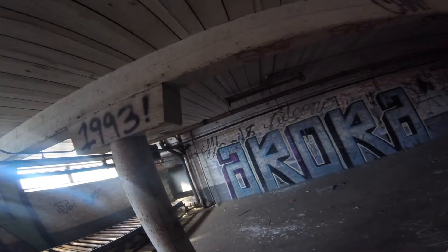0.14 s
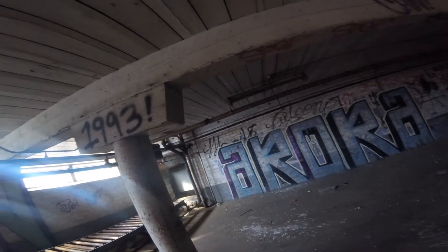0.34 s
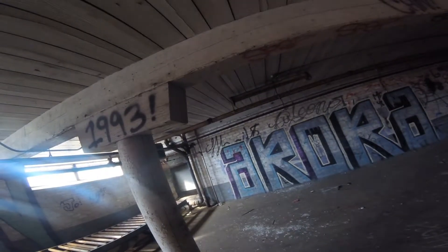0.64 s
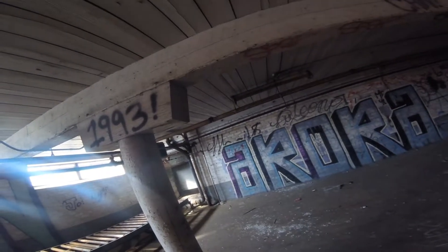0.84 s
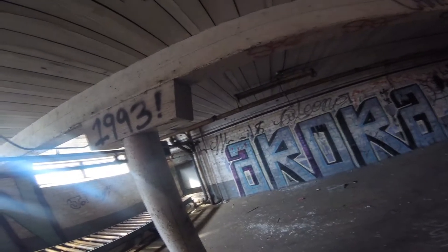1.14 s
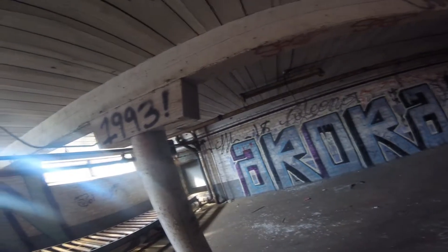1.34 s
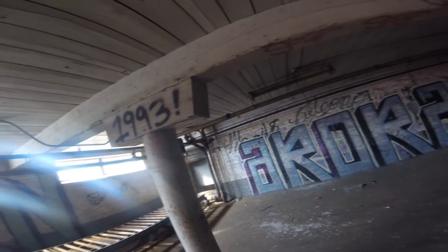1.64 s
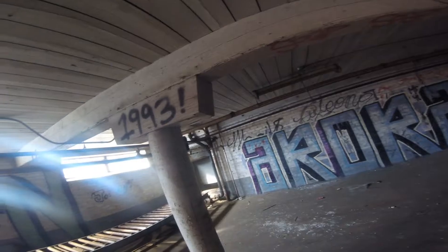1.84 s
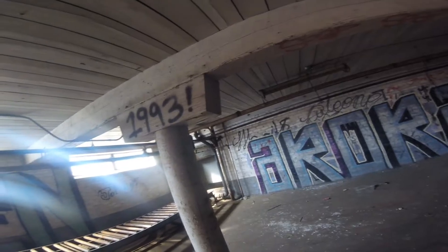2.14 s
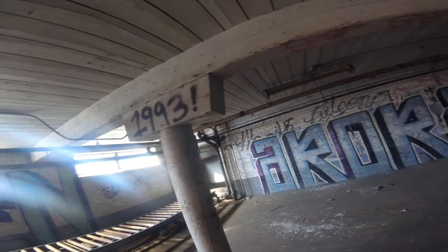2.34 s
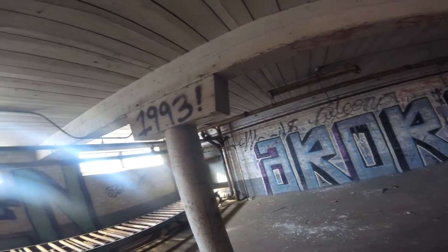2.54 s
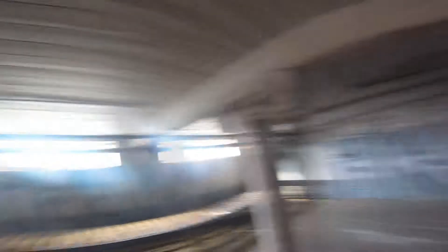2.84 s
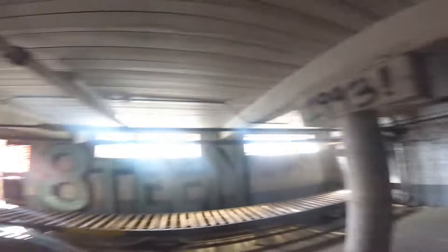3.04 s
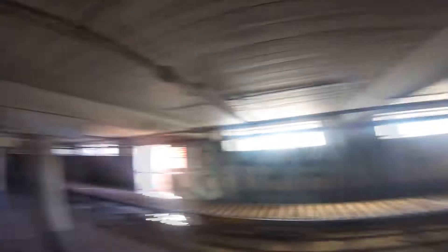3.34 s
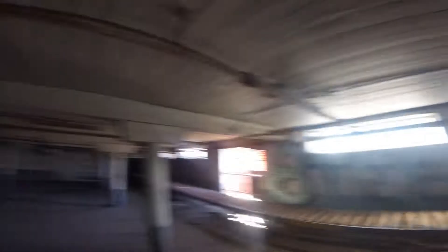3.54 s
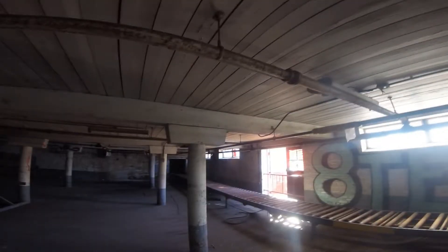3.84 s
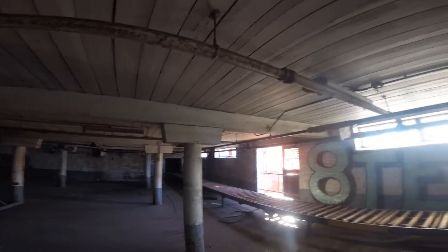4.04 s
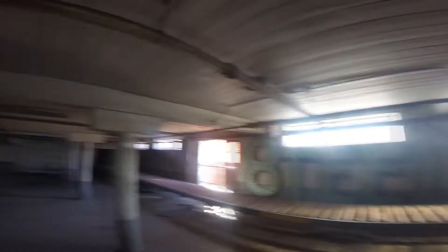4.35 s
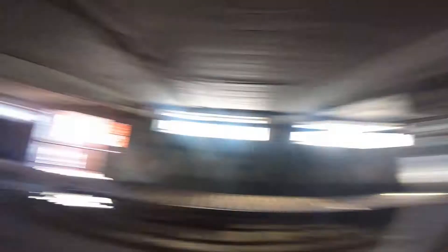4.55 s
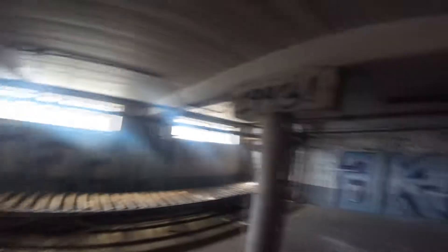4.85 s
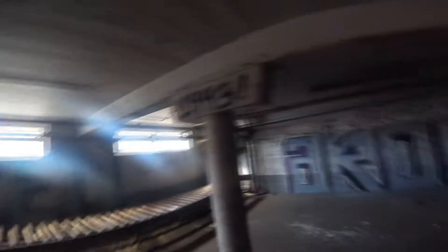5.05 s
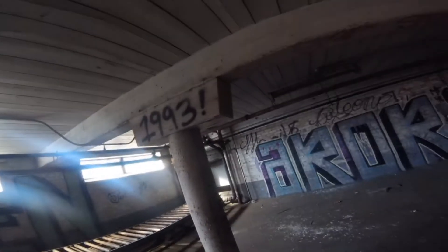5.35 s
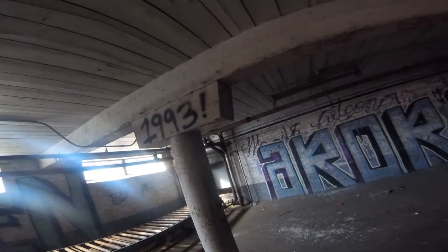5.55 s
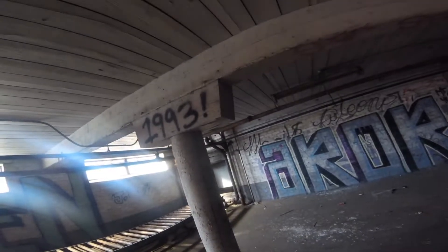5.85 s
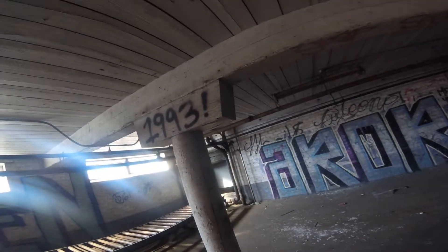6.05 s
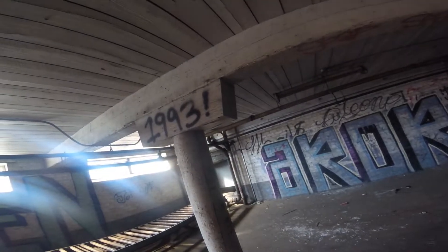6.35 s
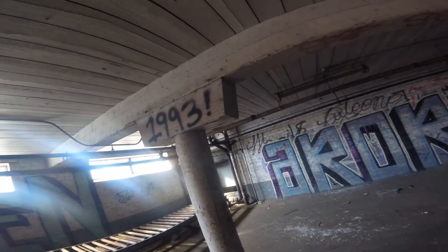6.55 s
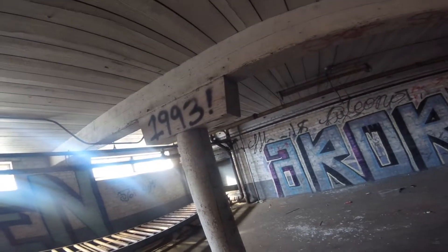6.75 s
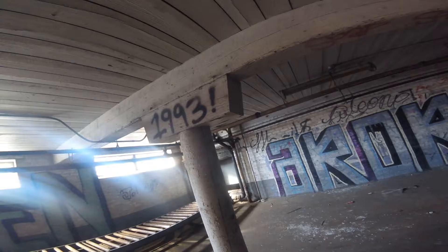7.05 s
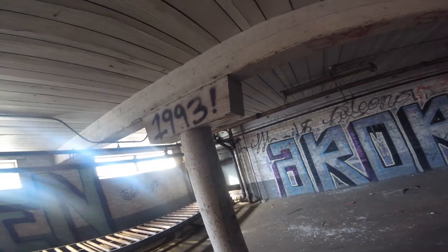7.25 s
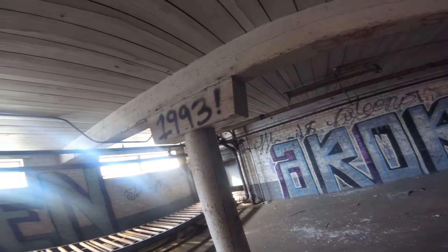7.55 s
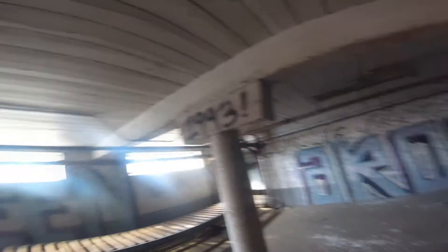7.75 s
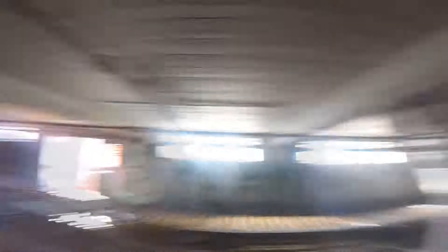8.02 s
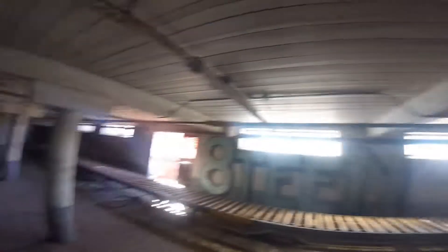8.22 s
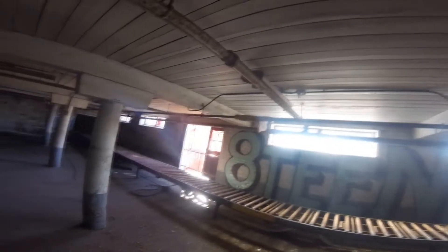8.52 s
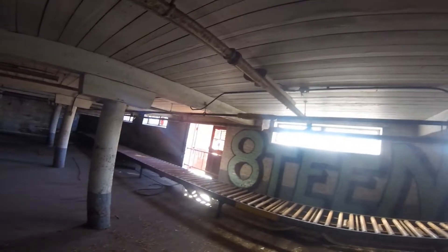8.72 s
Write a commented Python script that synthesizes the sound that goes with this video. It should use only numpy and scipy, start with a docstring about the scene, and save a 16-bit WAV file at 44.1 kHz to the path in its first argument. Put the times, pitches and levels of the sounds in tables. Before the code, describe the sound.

A person shifts weight in a large, bare concrete building. Chips snap and crumble under rubber soles, heels thud softly, small shards tick brightly. Activity comes in clusters: at the start, around four and a half seconds, and around seven, where a foot drags through grit and one loudest crack follows. Quick reflections and a tail over a second long; low handling rumble, faint wash and thin treble hiss.

```python
"""A large empty hall: someone shifts and turns on gritty concrete, a small camera and its microphone in hand.
Close below, chips crack under the soles in bursts of tiny fractures; one foot drags through the grit as
noise and snaps, and heels knock as damped sines. Floor, pillars and ceiling answer at once, the hall rings
on as decaying noise. Air and handling rumble on the microphone, over a faint wash and hiss."""
import sys
import numpy as np
from scipy import signal
from scipy.fft import rfft, irfft
from scipy.io import wavfile

SR = 44100
rng = np.random.default_rng(int(sys.argv[2]) if len(sys.argv) > 2 else 0)


def unload_audio(sound):
    """Save the sound as a 16-bit wav file, at the path given as the first command line argument."""
    columns = np.transpose(np.atleast_2d(sound))
    # keep every value between -1 and 1, then stretch to whole-number steps
    steps = np.round(np.clip(columns, -1, 1) * 32767)
    wavfile.write(sys.argv[1], SR, steps.astype(np.int16))


N = 391608
TIME = np.arange(N) / SR


def undb(db):
    """Decibels to gain."""
    return 10 ** (np.asarray(db) / 20)


def unit(x):
    """Scale to rms 1."""
    return x / np.sqrt(np.mean(x ** 2) + 1e-20)


def add(out, s, x):
    """Mix x into out from time s."""
    i = max(int(s * SR), 0)
    out[i:i + len(x)] += x[:max(N - i, 0)]


def band(x, lo_hz, hi_hz):
    """Causal band-pass."""
    edges = [lo_hz, min(hi_hz, SR / 2 - 1)]
    return signal.sosfilt(signal.butter(3, edges, "band", fs=SR, output="sos"), x)


def ring(x, hz, width_hz):
    """One resonance, gain 1 at its centre."""
    return signal.lfilter(*signal.iirpeak(hz, hz / width_hz, fs=SR), x)


def colour(x, spectrum, size=8192):
    """Causal minimum-phase filter through (Hz, dB) points, built from the cepstrum."""
    hz, db = np.transpose(spectrum)
    grid = np.maximum(np.arange(size // 2 + 1) * SR / size, 1)
    gain = undb(np.interp(np.log(grid), np.log(hz), db))
    cepstrum = irfft(np.log(gain))
    # fold the cepstrum onto positive time
    cepstrum[1:size // 2] *= 2
    cepstrum[size // 2 + 1:] = 0
    response = irfft(np.exp(rfft(cepstrum)))
    return signal.fftconvolve(x, response)[:len(x)]


def walk(rate):
    """Random wander, spread near 1, with straight lines between `rate` knots per second."""
    knots = rng.standard_normal(int(N / SR * rate) + 2)
    return np.interp(TIME * rate, np.arange(len(knots)), knots)


def gain_curve(s, db, fade=0.024):
    """Gain along a dB curve, fading to silence outside it."""
    gate = np.interp(TIME, [s[0] - fade, s[0], s[-1], s[-1] + fade], [0, 1, 1, 0])
    return undb(np.interp(TIME, s, db)) * gate


def fade(t, t60):
    """Exponential decay, 60 dB down after t60."""
    return np.exp(-np.log(1000) * t / t60)


def swell(s, half_s):
    """A smooth rise and fall around time s, top 1."""
    return np.exp(-np.minimum(((TIME - s) / half_s) ** 2, 20))


def fractures(count, rate, spread_db):
    """Tiny clicks of either sign at random moments, `rate` per second, their sizes spread in dB."""
    size = undb(spread_db * np.minimum(rng.exponential(size=count), 4))
    happens = rng.random(count) < rate / SR
    return happens * rng.choice([-1, 1], count) * size


# faint wash of the hall, heard from far off: (frequency [Hz], level [dB per Hz])
HALL_WASH = [(60, -1.5), (110, -5.5), (190, -9.5), (350, -11), (600, -16.5), (1300, -19.5), (2500, -23),
             (4000, -29.5), (6000, -41.5), (10000, -64)]
# the microphone's own hiss, peaked in the treble: (frequency [Hz], level [dB per Hz])
MICROPHONE_HISS = [(3000, -28.5), (5700, -11.5), (6200, -6), (6500, 3.5), (6950, -4.5), (8000, -6),
                   (9400, -11), (10200, -17.5), (12500, -15.5), (14500, -40)]


def background(wash_db=-56, hiss_db=-64.5):
    """The hall's even wash and the microphone's own hiss, both steady coloured noise."""
    wash = unit(colour(rng.standard_normal(N), HALL_WASH))
    hiss = unit(colour(rng.standard_normal(N), MICROPHONE_HISS))
    return undb(wash_db) * wash + undb(hiss_db) * hiss


# air rumble at the microphone: (frequency [Hz], level [dB per Hz])
AIR_RUMBLE = [(10, -5), (25, 3.5), (50, -3.5), (80, -9.5), (130, -18.5), (220, -26), (500, -69.5)]
# body sways that drive more air past the microphone: (middle [s], half length [s], rise [dB])
BODY_SWAYS = [(.1, 0.75, 6.5), (3.153, 0.21, 5.5), (4.55, 0.72, 6), (6.656, 0.79, 4)]
# pushes on the camera body: (time of the top [s], level [dB], pitch [Hz])
CAMERA_PUSHES = [(3.966, -29, 23.8), (6.59, -28.5, 55.5), (7.55, -30.5, 39.4)]


def handling(still_air_db=-47.5, gust_db=1, push_cycles=0.75):
    """Air rumbles on the microphone, more as the body sways; each push is a short low swing."""
    rises = sum(rise * swell(s, half) for s, half, rise in BODY_SWAYS)
    air_db = still_air_db + rises + gust_db * walk(23)
    out = unit(colour(rng.standard_normal(N), AIR_RUMBLE)) * undb(air_db)
    for s, db, hz in CAMERA_PUSHES:
        push = np.cos(2 * np.pi * hz * (TIME - s)) * swell(s, push_cycles / hz)
        out += undb(db) * push
    return out


SLIP_S, SLIP_HALF_S, SLIP_DB = 3.419, 0.016, -26  # middle [s], half length [s], level [dB]
SLIP_HZ, SLIP_OCTAVES_PER_S = 75.2, 35  # pitch at the middle and its rise


def finger_slip(overtone_db=-11):
    """Skin slips on the camera case: a brief low groan that rises, with its octave."""
    glide_s = np.clip(TIME - SLIP_S, -2 * SLIP_HALF_S, 2 * SLIP_HALF_S)
    hz = SLIP_HZ * 2 ** (SLIP_OCTAVES_PER_S * glide_s)
    phase = 2 * np.pi * np.cumsum(hz) / SR
    groan = np.sin(phase) + undb(overtone_db) * np.sin(2 * phase)
    return undb(SLIP_DB) * groan * swell(SLIP_S, SLIP_HALF_S)


def hall(x, far_db=-8.0, low_t60=1.77, mid_t60=1.17, high_t60=1.0,
         far_low_db=-4, far_high_db=-3, build_s=0.037):
    """The long diffuse tail of the empty hall: three noise bands, the treble dying first."""
    t = np.arange(3 * SR // 2) / SR
    low, mid, high = rng.standard_normal((3, len(t)))
    tail = undb(far_low_db) * band(low, 86, 980) * fade(t, low_t60)
    tail += band(mid, 1300, 4770) * fade(t, mid_t60)
    tail += undb(far_high_db) * band(high, 4600, 8700) * fade(t, high_t60)
    tail *= 1 - np.exp(-t / build_s)  # echoes gather before they decay
    return signal.fftconvolve(x, undb(far_db) * tail / np.linalg.norm(fade(t, mid_t60)))[:N]


def reflections(x, near_db=-6.0, near_t60=0.15):
    """Quick reflections from floor, pillars and low ceiling: sparse echoes after 5 ms."""
    t = np.arange(SR // 4) / SR
    echoes = fractures(len(t), rate=3800, spread_db=0.0) * fade(t, near_t60) * (t > 0.005)
    return signal.oaconvolve(x, undb(near_db) * echoes / np.linalg.norm(echoes))[:N]


def brush(s=1.805, half_s=0.056, level_db=-53, lo_hz=1200, hi_hz=4300, flutter_db=3.5):
    """A sole sweeps lightly over fine dust: a soft, fluttering hiss."""
    dust = unit(band(rng.standard_normal(N), lo_hz, hi_hz)) * undb(flutter_db * walk(59.8))
    return undb(level_db) * dust * swell(s, half_s)


# grit under a turning foot: (frequency [Hz], level [dB per Hz])
TURNED_GRIT = [(500, -2), (900, 1.5), (1600, 1), (3000, -3.5), (4300, -7), (5500, -14.5), (9000, -30)]
# rub of the rubber sole: (frequency [Hz], level [dB per Hz])
RUBBER_SOLE = [(120, -38), (260, -2.5), (400, -2), (550, -6.5), (900, -11.5), (2000, -48)]
# light turns of the foot, before the common trims of grit and rubber:
# (middle [s], half length [s], grit level [dB], rubber level [dB])
FOOT_TURNS = [(0.03, 0.13, -54, -56), (0.365, 0.12, -54, -49.5), (0.59, 0.035, -57, -49),
              (3.05, .05, -75, -58.5), (4.312, .07, -56.5, -61.5), (4.54, 0.056, -53.5, -57),
              (4.724, 0.068, -51.5, -48.5), (4.936, 0.07, -56.5, -53), (5.76, 0.28, -60.5, -58.5),
              (6.3, 0.28, -59, -58), (7.078, 0.059, -44.5, -53), (8.288, .06, -58.5, -62),
              (8.494, 0.084, -58, -56.5)]


def shuffles(grit_trim_db=-2, sole_trim_db=-2, jerk_db=2.0):
    """Light turns of the foot: sparse grit ticks over the rub of rubber, jerking together."""
    jerks = undb(jerk_db * walk(50))
    ticks = fractures(N, rate=500, spread_db=3.5)
    grit = unit(colour(ticks * jerks, TURNED_GRIT))
    rub = unit(colour(rng.standard_normal(N) * jerks, RUBBER_SOLE))
    out = np.zeros(N)
    for s, half, grit_db, sole_db in FOOT_TURNS:
        turn = grit * undb(grit_db + grit_trim_db) + rub * undb(sole_db + sole_trim_db)
        out += swell(s, half) * turn
    return out


# resonances added to dragged and crushed grit:
# (frequency [Hz], width [Hz], level re the plain sound [dB])
GRIT_RESONANCES = [(483, 93, -5.5), (1420, 220, -13.5), (2585, 230, -3.5), (2970, 130, -4), (4100, 330, -7),
                   (6410, 260, 6)]


def resonate(x):
    """Add the fixed resonances."""
    return x + sum(undb(db) * ring(x, hz, width) for hz, width, db in GRIT_RESONANCES)


# grit under the dragged foot: (frequency [Hz], level [dB per Hz])
DRAGGED_GRIT = [(120, -2), (300, -10.5), (500, 0.5), (720, -9.5), (1100, -6), (1450, 1), (1900, -1),
                (2250, -7), (2800, -4.5), (5200, -12), (6700, -15), (7600, -20.5), (10000, -39),
                (15000, -50)]
DRAG_START_S, DRAG_ATTACK_S, DRAG_END_S, DRAG_RELEASE_S = 6.51, 0.13, 6.975, 0.039
DRAG_DB, DRAG_BITE_DB, DRAG_LIFT_DB = -39.5, -2.5, -3  # the slide; its start and its end re the slide


def drag(sand_db=-4, gravel_db=-3.0, jerk_db=2.5, surge_db=0.9):
    """The sole bites, slides over sand, catching and slipping, and lets go; coarser grains snap."""
    sand = fractures(N, rate=3000, spread_db=-2.0) * undb(jerk_db * walk(50))
    snaps = fractures(N, rate=110, spread_db=2.5)
    # each snap is a puff of noise a millisecond or two long
    puff = np.exp(-np.arange(SR // 100) / SR / 0.0015)
    gravel = signal.oaconvolve(np.abs(snaps), puff)[:N] * rng.standard_normal(N)
    grains = undb(sand_db) * unit(sand) + undb(gravel_db) * unit(gravel)
    scrape = unit(resonate(colour(grains, DRAGGED_GRIT)))
    moments = [DRAG_START_S, DRAG_START_S + DRAG_ATTACK_S, DRAG_END_S, DRAG_END_S + DRAG_RELEASE_S]
    weight = gain_curve(moments, [DRAG_BITE_DB, 0, 0, DRAG_LIFT_DB])
    return undb(DRAG_DB) * scrape * weight * undb(surge_db * walk(16))


# heels set down: (time [s], level [dB], thud pitch [Hz], t60 [s])
HEEL_LANDINGS = [(0.422, -29.5, 470, 0.033), (0.527, -25, 330, 0.046), (4.656, -23.5, 200, 0.026),
                 (4.815, -28, 242.5, 0.014), (6.01, -28.5, 139, 0.047), (8.436, -35.5, 360, 0.061)]


def heels(rub_db=-6, rub_below=0.38, rub_above=2.22):
    """A rubber heel lands: one damped thud and a dull rub around its pitch."""
    out, t = np.zeros(N), np.arange(SR // 3) / SR
    for s, db, hz, t60 in HEEL_LANDINGS:
        rub = unit(band(rng.standard_normal(len(t)), rub_below * hz, rub_above * hz))
        thud = np.sin(2 * np.pi * hz * t)
        add(out, s, undb(db) * (thud + undb(rub_db) * rub) * fade(t, t60))
    return out


# hard shards that ring as they flip: (time [s], level [dB], pitch [Hz], t60 [s])
RINGING_SHARDS = [(3.685, -39.5, 1620, 0.13), (3.765, -26.5, 6520, 0.039), (5.129, -31, 1043, 0.017),
                  (7.033, -30.5, 6600, .04)]


def shards():
    """A flicked shard rings briefly with one clear note, a decaying sine."""
    out, t = np.zeros(N), np.arange(SR // 5) / SR
    for s, db, hz, t60 in RINGING_SHARDS:
        add(out, s, undb(db) * np.sin(2 * np.pi * hz * t) * fade(t, t60))
    return out


# an ordinary chip: its pitch [Hz], its crushing time [s]
CHIP_HZ, CHIP_S = 1450, 0.01
# shifts of weight in which crumbs give way: (start [s], end [s])
SHIFTS_OF_WEIGHT = [(4.45, 4.99), (6.26, 6.42)]
CRUMBS_PER_S, CRUMB_DB, CRUMB_SPLINTER_DB = 14, -51, -7.5  # mean rate and level; splinters re crack


def crumbs(scatter_db=2, pitch_octaves=0.85, crush_s=0.0068, count=12):
    """Small chips of random size and pitch, loosely spaced in each shift; rows as in CRUSHED_CHIPS."""
    rows = []
    for start, end in SHIFTS_OF_WEIGHT:
        times = start + (np.arange(count) + rng.random(count)) / CRUMBS_PER_S
        chance = rng.uniform(-1, 1, (count, 2))
        for s, (size, pitch) in zip(times, chance):
            if s < end:
                db = CRUMB_DB + scatter_db * size
                hz = CHIP_HZ * 2 ** (pitch_octaves * pitch)
                rows.append((s, db, CRUMB_SPLINTER_DB, hz, crush_s))
    return rows


# grit crushed underfoot: (frequency [Hz], level [dB per Hz])
CRUSHED_GRIT = [(120, -35.5), (200, -6.5), (280, -5.5), (480, -2.5), (700, -8.5), (1100, -3.5), (1500, 4.5),
                (2150, -4), (2800, -2), (5200, -11), (6800, -14.5), (7500, -18.5), (9000, -27.5),
                (15000, -51)]
# chips crushed underfoot, before the trims of crack and splinters:
# (time [s], crack level [dB], splinters re crack [dB], chip pitch [Hz], crushing time [s])
CRUSHED_CHIPS = [ (0.177, -39, -8, 1880, 0.0077), (0.188, -28, -8.5, 1950, 0.0058),
                 (0.403, -40, -18, 2400, .005), (0.527, -25.5, -5.5, 1430, 0.0085),
                 (0.634, -43, -8, 1000, 0.011), (0.674, -31, -5, 2500, 0.01),
                 (0.79, -35.5, -6.5, 1340, 0.013), (0.932, -48.5, -17, 2590, .009),
                 (0.998, -42, -15.5, 1017, 0.011), (1.092, -43, -10.5, 2480, 0.013),
                 (1.158, -45.5, -26, 1380, .0087), (1.303, -41.5, -16, 1390, 0.014),
                 (1.634, -45, -18, 1360, 0.011), (3.684, -46.5, -8, 1610, .016),
                 (3.764, -34, -4, 2760, 0.0073), (4.014, -35.5, 0, 1570, 0.0087),
                 (4.511, -45.5, -25, 1320, 0.0044), (4.657, -37.5, -14, 720, 0.0087),
                 (4.74, -46.5, -1, 2630, 0.0036), (4.816, -37.5, -18, 1190, 0.0056),
                 (4.828, -42.5, -2, 2360, 0.0065), (5.006, -45, -14.5, 785, 0.0064),
                 (5.129, -38, -28, 1110, 0.0036), (5.541, -51, -3.5, 1610, 0.0096),
                 (6.163, -44, -8, 800, 0.0072), (6.462, -44.5, -4, 1440, 0.0071),
                 (6.629, -41.5, -4, 1450, 0.011), (6.81, -38, -12, 1390, .0055),
                 (7.031, -35.5, -6, 2540, 0.01), (7.054, -31.5, -5.5, 1650, .012),
                 (7.137, -30.5, -2, 1720, 0.0093), (7.2643, -20, -3, 1420, 0.006)]
# bigger (lower) and slower-breaking chips shake the sole more
CHIP_BODY_DB, BODY_DB_PER_OCTAVE_DOWN, BODY_DB_PER_DOUBLE_TIME = -2.5, 8, 6.5


def crunches(chips, crack_trim_db=1, splinter_trim_db=2.0, chip_db=-15, toughness=0.92,
             crumble_db=-14, crumble_s=0.022, rise_share=0.34):
    """Each chip breaks in a burst of fractures and crumbles on; the sole takes lows, splinters highs."""
    out, t = np.zeros(N), np.arange(SR // 8) / SR
    for s, db, splinters, hz, length in chips:
        body_db = CHIP_BODY_DB + BODY_DB_PER_OCTAVE_DOWN * np.log2(CHIP_HZ / hz)
        body_db += BODY_DB_PER_DOUBLE_TIME * np.log2(length / CHIP_S)
        rise = 1 - np.exp(-t / (rise_share * length))
        force = rise * (np.exp(-(t / length) ** 2) + undb(crumble_db) * np.exp(-t / crumble_s))
        grains = [force * fractures(len(t), rate=11000, spread_db=2.5) for _ in range(3)]
        sole, chip, dust = (resonate(colour(g, CRUSHED_GRIT, size=2048)) for g in grains)
        # a chip that hardly splinters stays whole and rings at its own pitch
        tone = unit(ring(ring(grains[0], hz, hz / 2), hz, hz / 2))
        crack = unit(band(chip, 610, 3200)) + undb(chip_db - toughness * splinters) * tone
        burst = undb(crack_trim_db) * unit(crack)
        burst += undb(body_db) * unit(band(sole, 170, 875))
        burst += undb(splinter_trim_db + splinters) * unit(band(dust, 3930, 24000))
        # set the level by the top of the force, not by the mean over the window
        add(out, s, undb(db) * burst * np.sqrt(np.mean(force ** 2)) / force.max())
    return out


def scene(count=4, shard_hall_db=-6):
    """Feet close below in the hall, heard by a hand-held microphone."""
    steps = heels() + drag() + shuffles() + brush()
    chips = CRUSHED_CHIPS + crumbs()
    rings = shards()
    # a breaking chip sends a different burst in each direction, so the hall's answer is diffuse
    directions = [steps + crunches(chips) for _ in range(count)]
    tail = sum(hall(feet + undb(shard_hall_db) * rings) for feet in directions) / np.sqrt(count)
    direct = directions[0] + rings
    room = reflections(direct) + tail
    return (direct + room + handling() + finger_slip() + background())[None]


def record(dry, top_hz=14400):
    """The camera cuts the top with a steep low-pass."""
    return signal.sosfilt(signal.ellip(8, 0.2, 70, top_hz, fs=SR, output="sos"), dry)


dry = scene()
out = record(dry)
unload_audio(out)
```